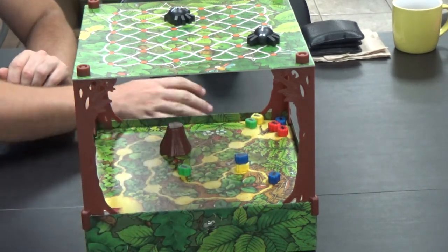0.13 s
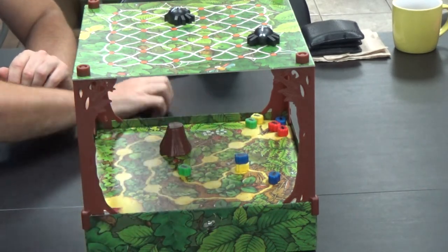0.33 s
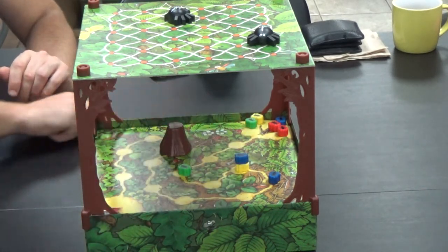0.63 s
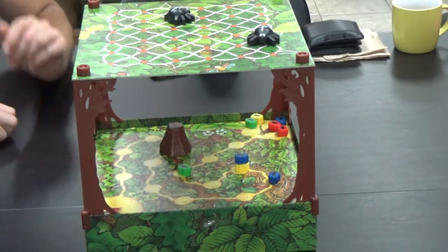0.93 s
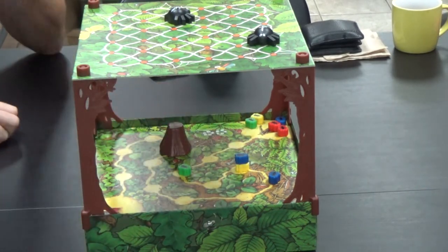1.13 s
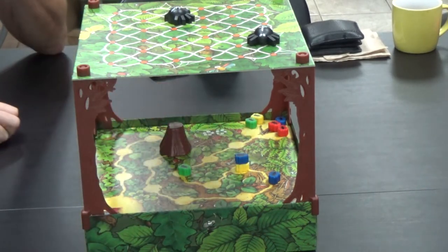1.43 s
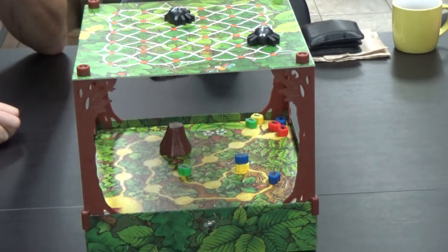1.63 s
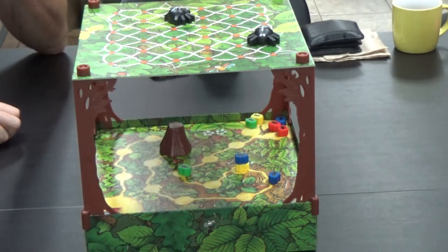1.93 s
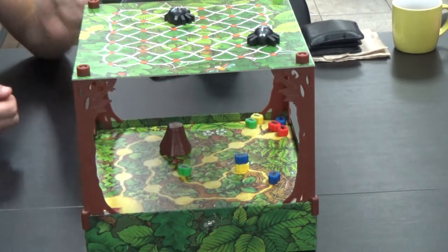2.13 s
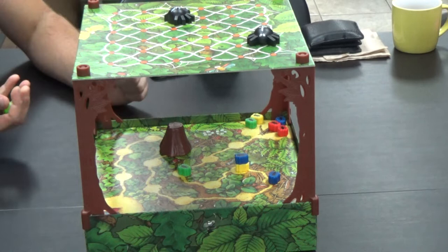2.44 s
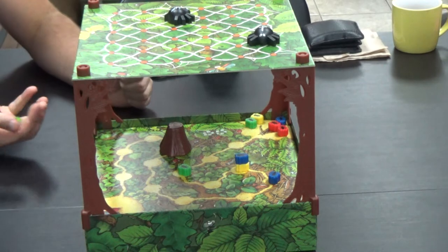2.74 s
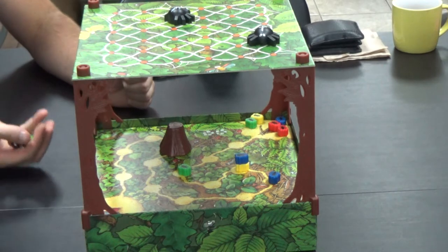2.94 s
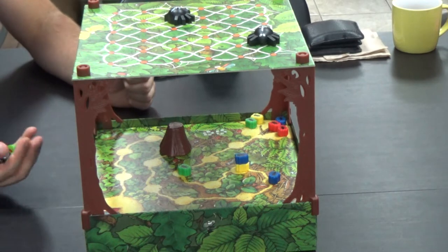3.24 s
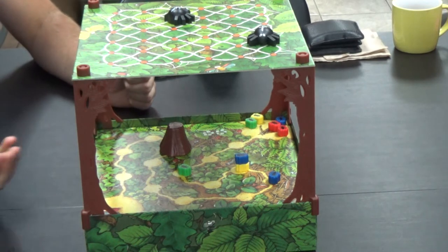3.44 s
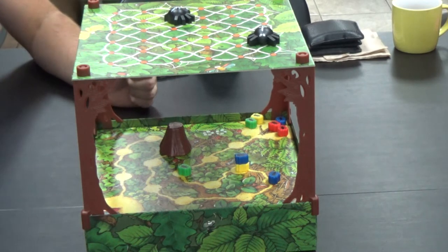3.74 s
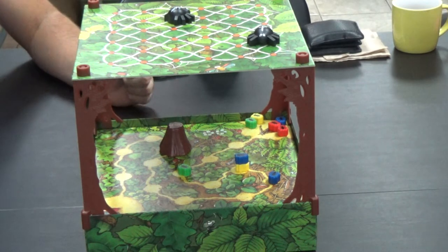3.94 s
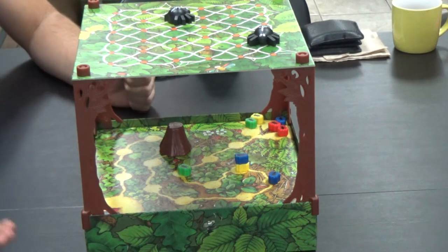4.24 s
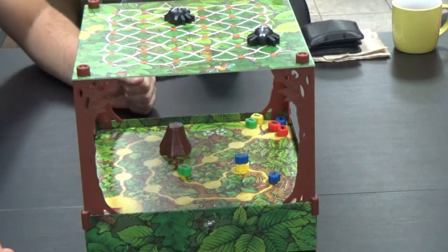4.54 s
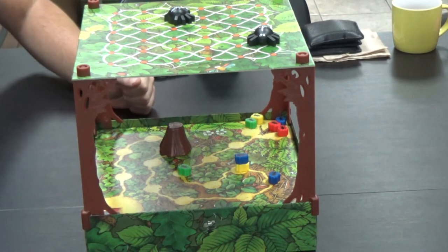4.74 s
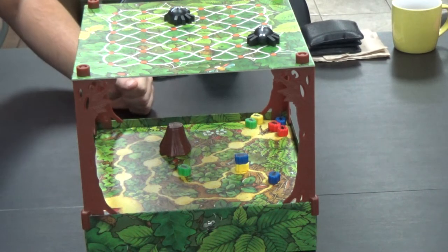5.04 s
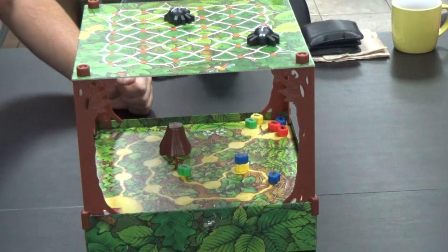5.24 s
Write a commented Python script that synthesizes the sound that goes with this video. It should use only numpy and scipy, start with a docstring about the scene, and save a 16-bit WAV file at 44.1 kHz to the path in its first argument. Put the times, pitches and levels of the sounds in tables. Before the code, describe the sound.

A close, nearly centred stereo perspective at a game table in a reflective room, with steady soft ventilation, faint low hum and barely noticeable low swells. From 0 to 0.5 s a hand brushes the table and scoops up dice: grainy scrapes, quick bright skids, small clicks and clacks. An arm slides away softly until about 1 s. From about 0.95 to 2.1 s the dice are shaken in a closed fist, muffled grainy strokes about five a second, with one soft knock near 2 s and a faint last stroke at 2.8 s. Isolated plastic ticks at 1.2 and 1.6 s become an irregular light chatter from 2.4 to 4.5 s, sharpest near 2.9, 3.35, 3.7 and 4.05 s. At 4.54 s the dice are thrown: loud hard clicks with woody board ring, bounces and die-on-die clacks crowd together until 5.07 s, then sparse settling taps to 5.3 s.

```python
"""Dice are scooped off a hard table: grainy scrapes and skids, with the first clicks and clacks.
They are shaken in a closed fist as soft, grainy strokes; small plastic pieces tick in another hand.
Then the dice are thrown: hard clicks, each with a ringing board, bounce, clack together and settle.
A live room of early reflections and diffuse tails answers the hits, over steady air noise and a low hum."""
import sys
import numpy as np
from scipy import signal
from scipy.fft import rfft, irfft
from scipy.io import wavfile

SR = 44100
rng = np.random.default_rng(int(sys.argv[2]) if len(sys.argv) > 2 else 0)


def wav_out(sig):
    """Save sig, one row per channel (or a flat mono array), as 16-bit PCM at SR to the path in sys.argv[1]."""
    wavfile.write(sys.argv[1], SR, np.round(np.clip(np.atleast_2d(sig).T, -1, 1) * 32767).astype(np.int16))


N = 236947  # length in samples

# Ventilation noise: f/Hz, level/dB per Hz
AIR_SPECTRUM = [(10, -14), (28, -5), (50, -4), (100, 3.5), (150, 1), (210, -6), (320, -9.5), (520, -14),
                (1000, -14.5), (1600, -20.5), (3200, -21), (6300, -25), (10000, -28.5), (13000, -30),
                (16000, -29)]
# Stereo width of the air: f/Hz, side minus mid/dB
AIR_WIDTH = [(60, -52), (150, -21.5), (400, -4.5), (1500, -2), (6000, -7), (10000, -18.5)]
# Mains hum partials: f/Hz, level/dB rms
HUM_PARTIALS = [(59.8, -69), (119.8, -58), (238, -71.5), (359, -73.5)]
AIR_DB = -55
# Faint low swells: t/s at the top, level/dB rms before the fade
LOW_SWELLS = [(0.399, -58.5), (.8, -57.5), (2.98, -59), (4.08, -58)]
RUMBLE_HZ, RUMBLE_S = 160, 0.46
BOOM_S, BOOM_DB, BOOM_HZ = 5.4, -56, 42  # a deep boom, still rising when the sound ends

# Room decay: f/Hz, t60/s
ROOM_DECAY = [(200, 1.24), (700, 0.79), (2000, 0.71), (4000, 0.3045), (7000, 0.59), (10000, 0.4),
              (15000, 0.06)]
# First reflections: delay t/s, level/dB
EARLY_ECHOES = [(.0024, -14), (.0036, -6), (.0108, -22), (0.0128, -13.5), (0.016, -24), (0.0203, -12)]
# Stereo width of the room tail: f/Hz, side minus mid/dB
ROOM_WIDTH = [(80, -29), (250, -28), (600, -18.5), (1200, -9), (4000, -9.5), (8000, -8), (11000, -24),
              (15000, -27)]
SPOTS = 4  # places from which hits excite the room

# Dice dragged over the table: start t/s, end t/s, level/dB
DRAGS = [(0, 0.121, -47), (0.222, 0.497, -42.5)]
# Tone of the drag: f/Hz, level/dB per Hz
SCRAPE_SPECTRUM = [(100, -15), (300, 1.5), (900, 0), (1900, 3), (3100, 3), (4300, -19.5), (7000, -19),
                   (10000, -34), (16000, -41)]
# Brief skids as the fingers catch the dice: t/s, level/dB
SKIDS = [(.2545, -30.5), (.3155, -27), (.361, -29), (.404, -32), (.466, -26), (.489, -37)]
# Tone of the skids: f/Hz, level/dB per Hz
SKID_SPECTRUM = [(500, -19), (1700, -1), (3000, 3.5), (5000, 3.5), (7500, -2), (10000, -15.5), (12000, -19),
                 (16000, -36)]
# Tone of the hand and arm brushing: f/Hz, level/dB per Hz
CLOTH_SPECTRUM = [(200, 4), (1000, -3.5), (3000, -2.5), (9500, -8), (12000, -9), (16000, -16)]
SKID_T60 = 0.058  # s
BRUSH_S, BRUSH_DB = (0, 0.232), -55  # the hand brushes over the table as it reaches for the dice
SLEEVE_S, SLEEVE_DB = (0.475, 1.034), -55  # an arm slides away
SLIDE_ATTACK_S, SLIDE_RELEASE_S = 0.015, 0.024

# Muffled strokes of the shaken fist, mostly about five a second: t/s, level/dB
SHAKES = [(0.961, -49), (1.142, -48), (1.312, -47), (1.488, -51), (1.678, -47.5), (1.891, -50.5),
          (2.092, -57), (2.79, -53)]
# Tone of the dice rubbing in the fist: f/Hz, level/dB per Hz
FIST_SPECTRUM = [(200, -4), (450, 4.5), (800, -8.5), (1300, 3), (2300, -3.5), (3000, -5.5), (3900, -14),
                 (5400, -6), (9500, -6.5), (12000, -15), (16000, -29)]
# Resonances of the hollow hand: f/Hz, level/dB, t60/s
FIST_MODES = [(1190, 2.5, 0.0077), (1580, 5, 0.0046), (2112, -2.5, 0.034), (2940, -1, 0.029),
              (5320, -5.5, 0.038)]
# Resonances of one soft knock: f/Hz, level/dB, t60/s
KNOCK_MODES = [(246, -1.5, 0.065), (433, -3, 0.043), (524, -3, 0.06), (713, 0, 0.047), (1490, -2, 0.034),
               (1620, 2, 0.022), (2360, 3, 0.015)]
SHAKE_T60 = 0.29  # s
SWING_BACK_S, SWING_BACK_DB = 0.05, -7.5  # the dice fall back later and more softly
KNOCK_S, KNOCK_DB = 1.977, -46.5

# Plastic pieces knock in a hand: t/s, click peak level/dB, centre f/Hz, narrowness of the ring (factor),
# room send/dB relative to the click, before a common trim
PIECES = [(1.2035, -26.5, 4270, 0.82, -6), (1.6435, -39.5, 2820, 2, -17), (2.4325, -24, 6400, 1.1, -5),
          (2.5168, -31, 5350, .75, 0), (2.5559, -35, 3800, 0.62, 5), (2.606, -31, 5400, 1.1, 1.5),
          (2.7124, -23.5, 4990, 1.3, -1.5), (2.8756, -14, 6180, 1.44, -2), (2.8956, -21, 5560, 0.75, -1.5),
          (2.9687, -23.5, 5360, 1, -2), (3.016, -23.5, 5330, 0.99, 1), (3.0227, -22.5, 5130, .8, -2),
          (3.166, -27.5, 4870, 0.63, 4), (3.243, -31, 4350, 1, 1), (3.3382, -8.5, 7800, 1.2, -4.5),
          (3.49, -31, 4630, 1.4, -9), (3.5688, -24, 4900, 1.3, -3.5), (3.6024, -26, 4100, .8, -1),
          (3.6716, -28.5, 5400, 0.88, 2), (3.7081, -15.5, 5950, 0.94, -2), (3.879, -28, 5420, 0.96, 5),
          (4.0025, -26.5, 4310, 1.6, -8), (4.0429, -17.5, 6000, 2.1, 1), (4.0591, -14.5, 5130, 1, -.5),
          (4.135, -23, 5780, 1, -1.5), (4.1821, -23, 5500, 1.2, -4.5), (4.21, -27.5, 5700, 2.2, -12),
          (4.2597, -24.5, 5300, 1.5, -20), (4.265, -23, 6260, 1, -3.5), (4.462, -23.5, 5860, 1.03, -3)]
# Direct piece click, for a centre of CLICK_HZ: f/Hz, level/dB per Hz
PIECE_CLICK = [(300, -45), (1300, -18), (2600, -9), (4000, -6.5), (5000, 0.5), (6200, -4), (8000, -15.5),
               (10500, -37), (16000, -44)]
# Piece click as thrown into the room, for a centre of CLICK_HZ: f/Hz, level/dB per Hz
PIECE_SPREAD = [(300, -39), (1200, -12.5), (2200, -3.5), (4000, 3), (5000, 2.5), (6200, -2.5), (8000, -13),
                (11000, -29), (16000, -40)]
CLICK_HZ = 5000
SETTLE_S, SETTLE_DB = 0.014, -13.5  # after each knock the piece touches once more
# faint ticks while the fingers turn the pieces
FIDGET_S, FIDGET_DB, FIDGET_HZ = (3.42, 3.85), -31.5, 4620
FIDGET_NARROW, FIDGET_ROOM_DB = 1.2, -8

# Dice land on the table, while scooped up or after the throw: t/s, click peak level/dB,
# blow to the board level/dB, room send/dB relative to the click
BOUNCES = [(.0733, -27.5, -15, -2), (.2562, -20.5, -15.5, 4), (0.3085, -21, -17.5, -2),
           (0.3144, -30, -12, 0), (.3657, -33, -11.5, 0), (.3928, -18, -13.5, 0.5), (0.453, -25, -21, 1),
           (0.4954, -29, -21, -7), (4.5387, -3.5, 1, -2), (4.5761, -14.5, -10, 5.5), (4.6319, -2.5, -3, -3),
           (4.7142, -1.5, 1, -8), (4.7231, -3, -4, -3.5), (4.7389, -7, -2, 3.5), (4.8309, -5, -4, -2),
           (4.8698, -7, -5.5, -1.5), (4.9177, -14, -4.5, -6), (4.9401, -11.5, -5.5, -4),
           (4.9842, -2, -9, -8), (5.1664, -6.5, -10.5, -13), (5.2381, -17, -14, -17),
           (5.2728, -24.5, -16, 2), (5.2936, -21.5, -33, -15)]
# Two dice clack together: t/s, click peak level/dB, centre f/Hz, room send/dB relative to the click
CLACKS = [(.405, -17.5, 5500, 4), (0.4684, -20, 5400, 3), (0.4741, -17.5, 5400, 6), (4.6603, -20, 5560, -3),
          (4.6626, -1.5, 6500, 3.5), (4.6635, -14.5, 7400, 9.5), (4.7895, -2.5, 5600, -23),
          (4.7965, -4, 5270, -8), (4.8059, -3.5, 5360, 1.5), (4.8554, -5, 5800, -20),
          (4.8613, -1.5, 5600, -3.5), (4.8895, -7, 5100, -11), (4.8926, -5.5, 5670, -4.5),
          (5.015, -7.5, 5230, -1.5), (5.0167, -13, 5200, 1), (5.0481, -5, 5270, -11),
          (5.066, -8.5, 5370, -25)]
# Direct die click, for a centre of CLICK_HZ: f/Hz, level/dB per Hz
DIE_CLICK = [(200, -37), (900, -13), (2000, -3), (4000, 0.5), (6300, 1.5), (8000, -6), (10000, -23),
             (16000, -40)]
# Die click as thrown into the room, for a centre of CLICK_HZ: f/Hz, level/dB per Hz
DIE_SPREAD = [(200, -28), (900, -15.5), (2000, -2), (4000, -0.5), (6300, -1.5), (8000, -11), (10500, -23),
              (16000, -26)]
# Dense thud of the board: f/Hz, level/dB per Hz
BOARD_SPECTRUM = [(100, -26.5), (220, -19.5), (340, -13.5), (500, -9), (700, -9.5), (1100, -7.5), (1700, 0),
                  (2700, 3.5), (3600, -0.5), (5500, -16), (7500, -19.5), (11000, -26), (16000, -59)]
# Ringing modes of the board: f/Hz, level/dB, t60/s
BOARD_MODES = [(340.5, -9, 0.14), (496.3, -0.5, 0.23), (726, -1.5, 0.25), (1117, -4, 0.069),
               (1640, -24, 0.11), (1693, -5, 0.084), (2010, -6, 0.23), (2320, -20, 0.079),
               (2545, 11, 0.058), (2730, 16.5, 0.098), (3360, -5, 0.42), (4040, 6.5, 0.072)]
# a harder landing clicks brighter: centre of the softest, and the rise up to a full-scale hit
SOFT_HZ, HARD_RISE_HZ = 3460, 1497
CLACK_BLOW_DB = -5.5  # share of a clack that reaches the board

# Top-treble response of the microphone: f/Hz, level/dB
MICROPHONE = [(10500, 0), (11900, -3), (13000, 1), (14500, -3.5), (16000, -6)]
EDGE_HZ = 16000  # upper band limit


def amp(db):
    """Decibels to gain."""
    return 10 ** (np.asarray(db) / 20)


def read(points, hz):
    """A table read on a log-frequency axis."""
    f, value = np.transpose(points)
    return np.interp(np.log(hz + 1), np.log(f + 1), value)


def unit(x):
    """Scaled to energy 1."""
    return x / np.sqrt(np.sum(x ** 2) + 1e-20)


def add(mix, s, sound):
    """Mixes a sound in at time s."""
    part = mix[max(round(s * SR), 0):][:len(sound)]
    part += sound[:len(part)]


def equalise(x, curve):
    """Filters x by a level curve, without shifting phase."""
    gain = amp(read(curve, np.fft.rfftfreq(len(x), 1 / SR)))
    return irfft(rfft(x) * gain, len(x))


def colour(x, spectrum):
    """Filters x by a spectrum and brings it to rms 1."""
    return unit(equalise(x, spectrum)) * np.sqrt(len(x))


def pulse(spectrum, stretch=1, size=1024):
    """The shortest causal (minimum-phase) pulse with this spectrum, peak 1; stretch moves it up in pitch."""
    hz = abs(np.fft.fftfreq(size, 1 / SR)) / stretch
    log_gain = np.log(amp(read(spectrum, hz)))
    wave = np.fft.ifft(np.exp(np.conj(signal.hilbert(log_gain)))).real
    envelope_peak = abs(signal.hilbert(wave)).max()
    return wave[:size // 2] / envelope_peak


def decay(t, t60):
    """Exponential fade that reaches -60 dB at t60."""
    return np.exp(-np.log(1000) * t / t60)


def ring(modes, spread_db=0, size=8192):
    """Dying modes with random signs; spread_db varies their strengths with the spot that is struck."""
    t = np.arange(size) / SR
    hz, db, t60 = np.transpose(modes)[:, :, None]
    sign = rng.choice([-1, 1], hz.shape)
    strength = sign * amp(db + spread_db * rng.standard_normal(hz.shape))
    return (strength * decay(t, t60) * np.sin(2 * np.pi * hz * t)).sum(0)


def burst(fade_s, size=8192):
    """Dense dying vibration of energy 1, roughly even over all frequencies."""
    fade = decay(np.arange(size) / SR, fade_s)
    x = rng.standard_normal(size) * fade
    even = irfft(np.exp(1j * np.angle(rfft(x))), size)  # keep the phases, flatten the spectrum
    return unit(even * np.sqrt(fade))  # this second fade hastens the decay


def grains(per_s, spread_db):
    """Tiny slips of uneven size at random moments."""
    slips = rng.standard_normal(N) * (rng.random(N) < per_s / SR)
    return slips * amp(spread_db * np.minimum(rng.exponential(1, N), 3))


def strokes(rows, t60):
    """Gain at every sample for strokes that start sharply and die away."""
    gain, t = np.zeros(N), np.arange(SR // 2) / SR
    for s, db in rows:
        add(gain, s, amp(db) * decay(t, t60))
    return gain


def slide(start, end, db):
    """Gain at every sample for a sliding motion: attack before start, hold, release after end."""
    t = np.arange(N) / SR
    attack = (t - start) / SLIDE_ATTACK_S + 1
    release = (end - t) / SLIDE_RELEASE_S + 1
    return amp(db) * np.clip(np.minimum(attack, release), 0, 1)


def air(waver=0.28):
    """Steady ventilation noise, nearly mono in the bass, with a slightly wavering mains hum."""
    t = np.arange(N) / SR
    mid, side = (amp(AIR_DB) * colour(z, AIR_SPECTRUM) for z in rng.standard_normal((2, N)))
    side = equalise(side, AIR_WIDTH)
    for f, db in HUM_PARTIALS:
        drift = np.interp(t, np.linspace(0, t[-1], num=30), rng.standard_normal(size=30))
        tone = np.sin(2 * np.pi * (f * t + rng.random()))
        mid = mid + np.sqrt(2) * amp(db) * (1 + waver * drift) * tone
    return np.array([mid + side, mid - side])


def swell(s, db, hz, spread=0.18):
    """Narrow low noise that swells and fades around time s."""
    out, size = np.zeros(N), int(RUMBLE_S * SR)
    distance = np.log((np.fft.rfftfreq(SR, 1 / SR) + 1) / hz) / spread
    band = np.exp(-distance ** 2)
    noise = irfft(band * np.exp(2j * np.pi * rng.random(len(band))))[:size]
    add(out, s - RUMBLE_S / 2, amp(db) * noise / noise.std() * np.hanning(size))
    return out


def rumble():
    """A few faint low swells of narrow noise, and a deeper boom rising as the dice settle."""
    return sum(swell(s, db, RUMBLE_HZ) for s, db in LOW_SWELLS) + swell(BOOM_S, BOOM_DB, BOOM_HZ)


def room(x, build_s=0.0012):
    """Early reflections and a diffuse tail, each band dying at its own rate; close microphones hear it nearly alike."""
    hz, t, z = signal.stft(rng.standard_normal((2, SR)), SR, nperseg=256)
    fading = z * decay(t, read(ROOM_DECAY, hz)[:, None])
    tails = signal.istft(fading, SR, nperseg=256)[1][:, :SR]
    tails = tails * (1 - np.exp(-np.arange(SR) / SR / build_s))  # the tail builds up quickly
    mid = unit(tails[0])
    side = equalise(unit(tails[1]), ROOM_WIDTH)
    for s, db in EARLY_ECHOES:
        add(mid, s * rng.uniform(0.93, 1.07), amp([db]))
    response = np.array([mid + side, mid - side])
    return signal.fftconvolve(x[None], response, axes=1)[:, :N]


def scoop():
    """The hand reaches in and dice scrape and skid as grainy friction; then the arm slides away as soft noise."""
    scrape = sum(slide(*row) for row in DRAGS) * colour(grains(per_s=2000, spread_db=2.5), SCRAPE_SPECTRUM)
    skids = strokes(SKIDS, SKID_T60) * colour(grains(per_s=4000, spread_db=2.0), SKID_SPECTRUM)
    motion = slide(*BRUSH_S, BRUSH_DB) + slide(*SLEEVE_S, SLEEVE_DB)
    arm = motion * colour(rng.standard_normal(N), CLOTH_SPECTRUM)
    return scrape + skids + arm


def fist(ring_db=-10, rub_db=-3):
    """Grainy rubbing resonates in the hollow of the shaken hand, with one soft knock."""
    swing_backs = np.array(SHAKES) + [SWING_BACK_S, SWING_BACK_DB]
    swings = strokes(SHAKES, SHAKE_T60) + strokes(swing_backs, SHAKE_T60)
    rub = amp(rub_db) * swings * colour(grains(per_s=2700, spread_db=-1.5), FIST_SPECTRUM)
    out = rub + amp(ring_db) * signal.fftconvolve(rub, unit(ring(FIST_MODES)))[:N]
    add(out, KNOCK_S, amp(KNOCK_DB) * ring(KNOCK_MODES))
    return out


def piece_hits(count=6, spread_db=-0.5, spread_octaves=0.12):
    """Knocks, the lighter touch after each, and stray ticks at uneven intervals, in the columns of PIECES."""
    touches = [(s + SETTLE_S * rng.uniform(0.5, 1.5), db + SETTLE_DB, *timbre) for s, db, *timbre in PIECES]
    times = np.interp(np.arange(count) + rng.random(count), [0, count], FIDGET_S)
    ticks = []
    for s, (a, b) in zip(times, rng.standard_normal((count, 2))):
        hz = FIDGET_HZ * 2 ** (spread_octaves * b)
        ticks.append((s, FIDGET_DB + spread_db * a, hz, FIDGET_NARROW, FIDGET_ROOM_DB))
    return list(PIECES) + touches + ticks


def pieces(chatter_db=-9, chatter_fade_s=0.024, send_db=-2):
    """Light plastic pieces tick and chatter for a few milliseconds: (direct, sent to the room)."""
    near, far = np.zeros(N), np.zeros((SPOTS, N))
    for k, (s, db, hz, narrow, room_db) in enumerate(piece_hits()):
        spectrum = np.array(PIECE_CLICK) * [1, narrow]  # narrower rings longer
        click = amp(db) * pulse(spectrum, hz / CLICK_HZ)
        add(near, s, click)
        add(near, s, amp(chatter_db) * signal.fftconvolve(click, burst(chatter_fade_s)))
        add(far[k % SPOTS], s, amp(db + room_db + send_db) * pulse(PIECE_SPREAD, hz / CLICK_HZ))
    return near, far


def die_hits():
    """Landings and clacks as (t/s, click level/dB, centre f/Hz, click in the room/dB, blow/dB)."""
    landings = [(s, db, SOFT_HZ + HARD_RISE_HZ * amp(db), db + room_db, blow_db)
                for s, db, blow_db, room_db in BOUNCES]
    clacks = [(s, db, hz, db + room_db, db + CLACK_BLOW_DB) for s, db, hz, room_db in CLACKS]
    return landings + clacks


def dice(mirror_s=0.00082, mirror_db=-7, board_db=3.5, modes_db=-8, board_fade_s=0.025, near_db=-7, shiver_db=-8):
    """A hard click, its mirror image off the table top and the board's ring: (direct, sent to the room)."""
    near, far, board = np.zeros(N), np.zeros((SPOTS, N)), pulse(BOARD_SPECTRUM)
    for k, (s, db, hz, room_db, blow_db) in enumerate(die_hits()):
        click = amp(db) * pulse(DIE_CLICK, hz / CLICK_HZ)
        thud = amp(board_db) * unit(signal.fftconvolve(burst(board_fade_s), board)[:8192])
        modes = amp(modes_db) * unit(ring(BOARD_MODES, spread_db=5.5))
        body = amp(blow_db) * (thud + modes)
        shiver = signal.fftconvolve(click, burst(fade_s=0.011))  # scatter off things nearby
        add(near, s, click)
        add(near, s + mirror_s * rng.uniform(0.93, 1.2), amp(mirror_db) * click)
        add(near, s + mirror_s, amp(shiver_db) * shiver)
        add(near, s, amp(near_db) * body)
        add(far[k % SPOTS], s, body)  # the wide board radiates mostly into the room
        add(far[k % SPOTS], s, amp(room_db) * pulse(DIE_SPREAD, hz / CLICK_HZ))
    return near, far


def scene(left_db=1.05, scoop_near_db=-3, scoop_room_db=-4, fist_room_db=-7):
    """Direct sound sits a little left of centre; each spot excites the room in its own way."""
    dice_near, dice_far = dice()
    pieces_near, pieces_far = pieces()
    scooped, shaken = scoop(), fist()
    near = dice_near + pieces_near + amp(scoop_near_db) * scooped + shaken
    far = dice_far + pieces_far
    add(far[0], 0, amp(scoop_room_db) * scooped + amp(fist_room_db) * shaken)
    direct = near * amp([[left_db], [-left_db]])
    return direct + sum(room(spot) for spot in far) + air() + rumble()


def record(dry):
    """The microphone shapes the top treble, the highest peaks are rounded off; then the band limit."""
    response = amp(read(MICROPHONE, np.fft.rfftfreq(N, 1 / SR)))
    heard = irfft(rfft(dry) * response, N)
    rounded = heard / (1 + (heard / 0.75) ** 6) ** (1 / 6)  # smooth ceiling at 0.75
    lowpass = signal.firwin(401, EDGE_HZ, window=("kaiser", 9), fs=SR)
    return signal.oaconvolve(rounded, lowpass[None], "same")


dry = scene()
out = record(dry)
wav_out(out)
```